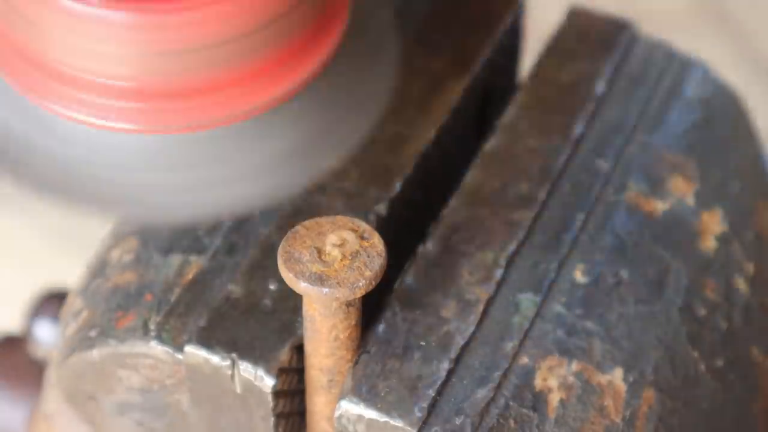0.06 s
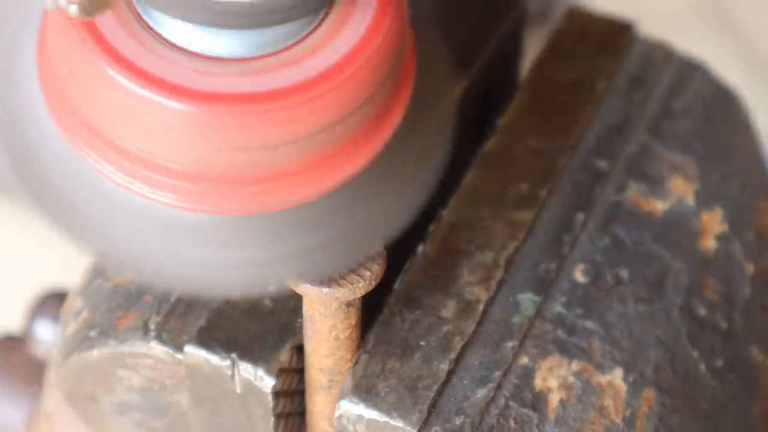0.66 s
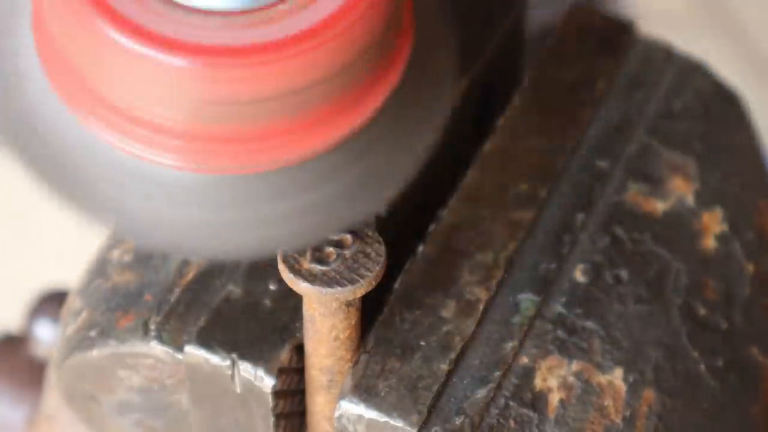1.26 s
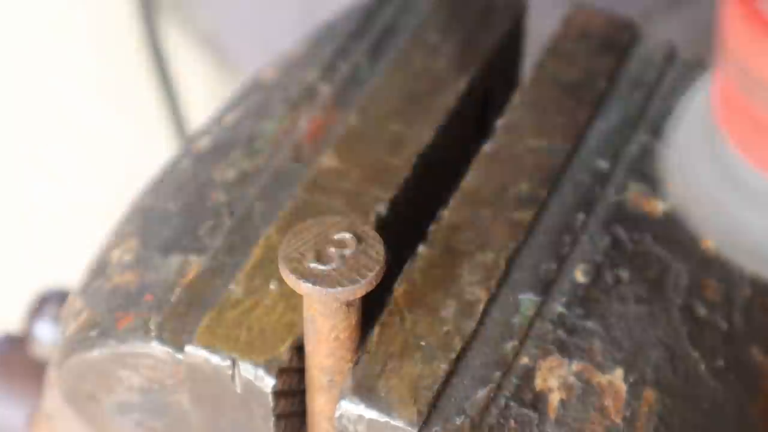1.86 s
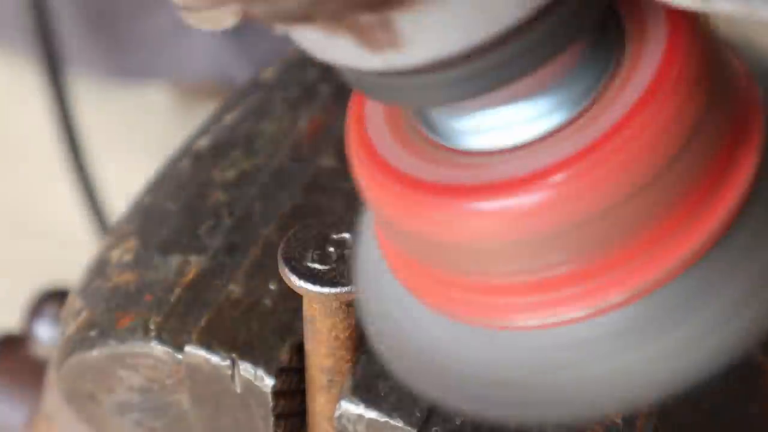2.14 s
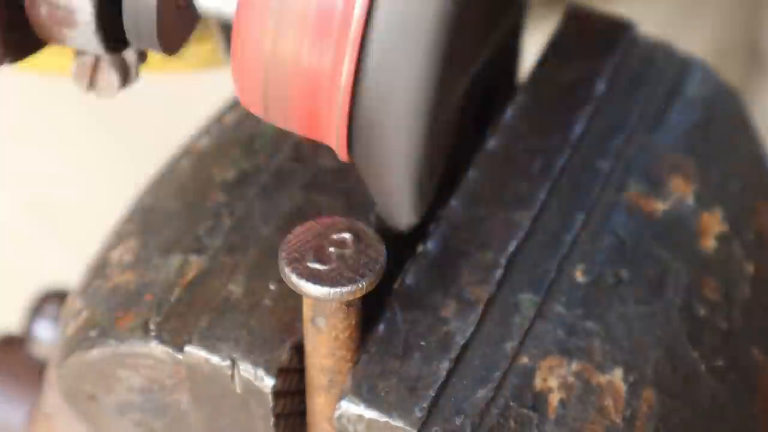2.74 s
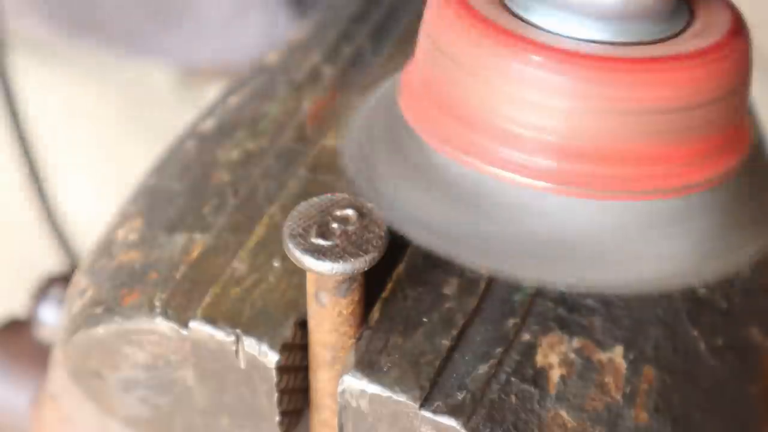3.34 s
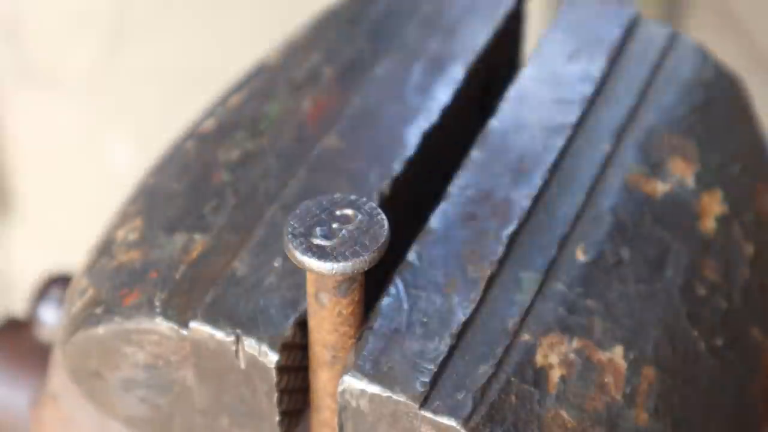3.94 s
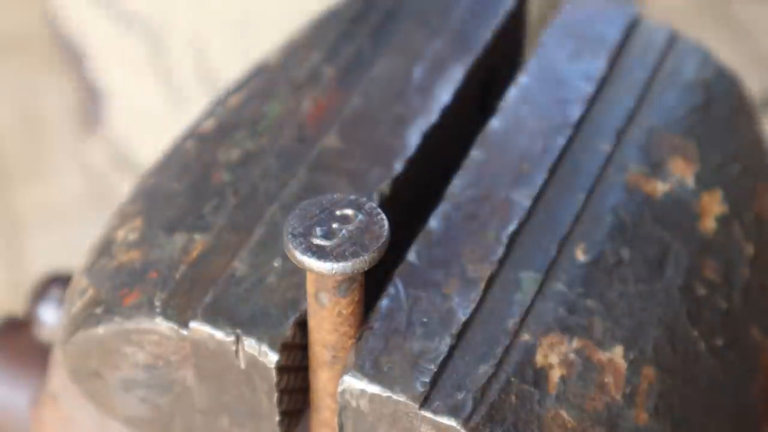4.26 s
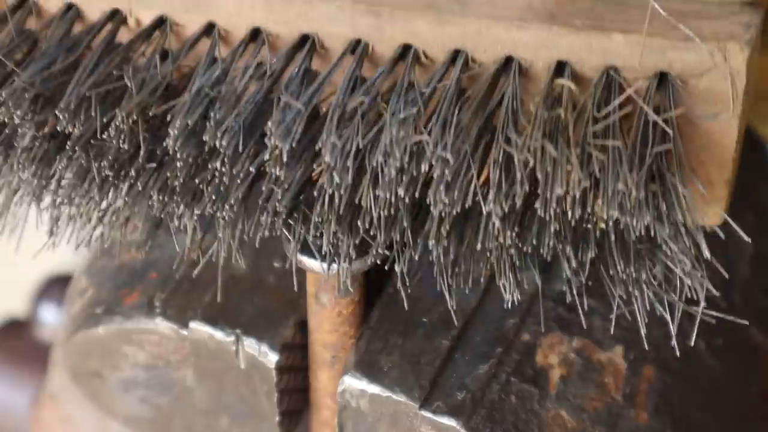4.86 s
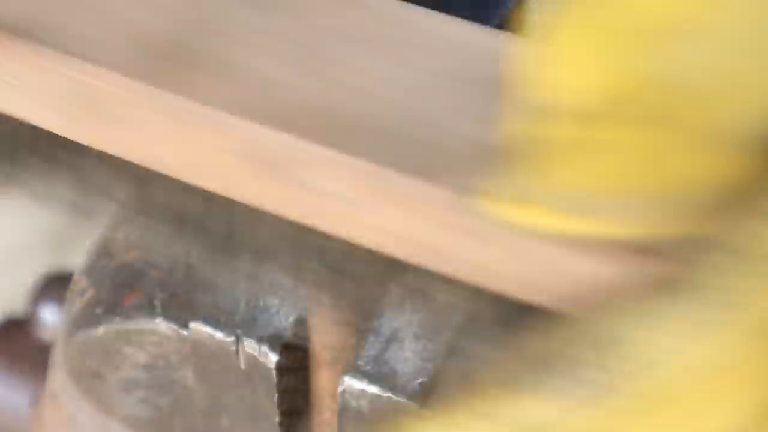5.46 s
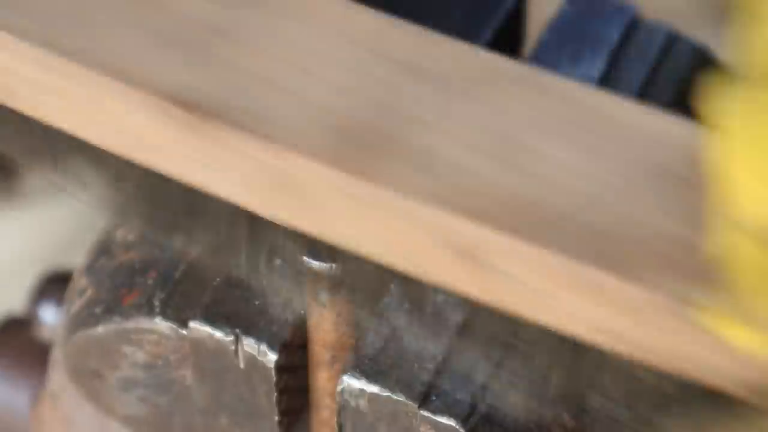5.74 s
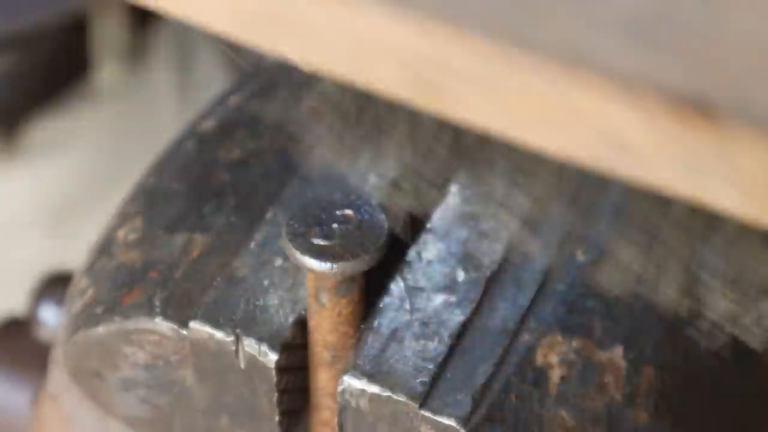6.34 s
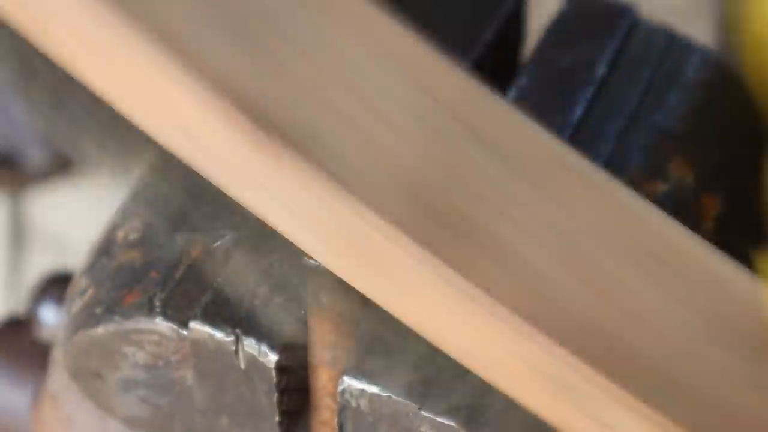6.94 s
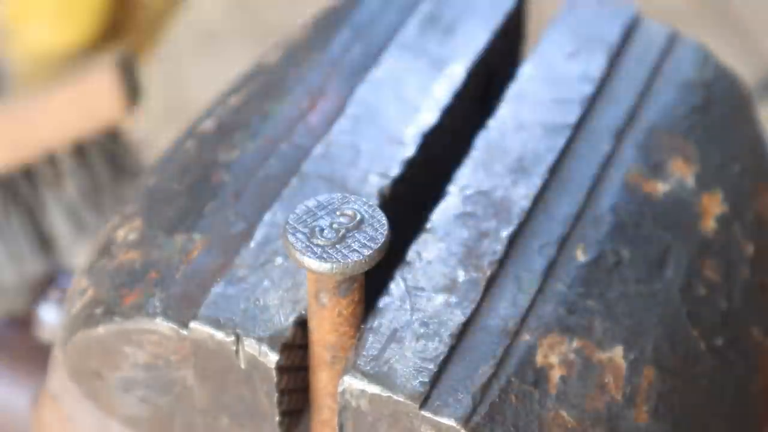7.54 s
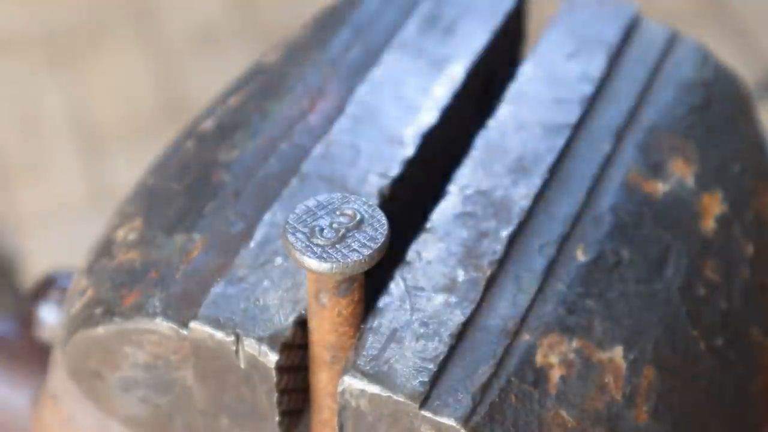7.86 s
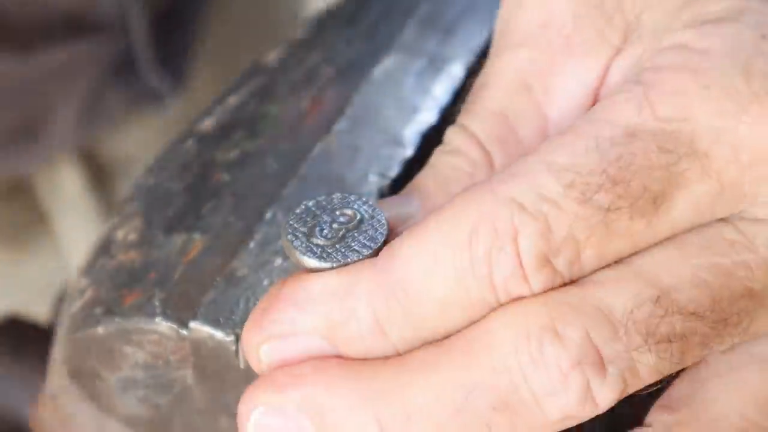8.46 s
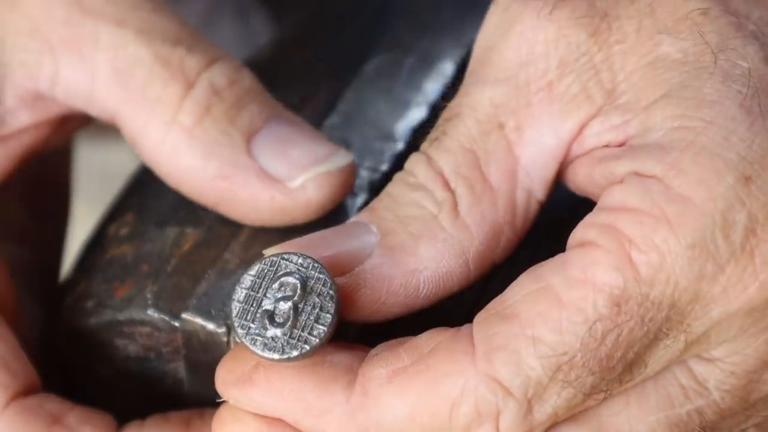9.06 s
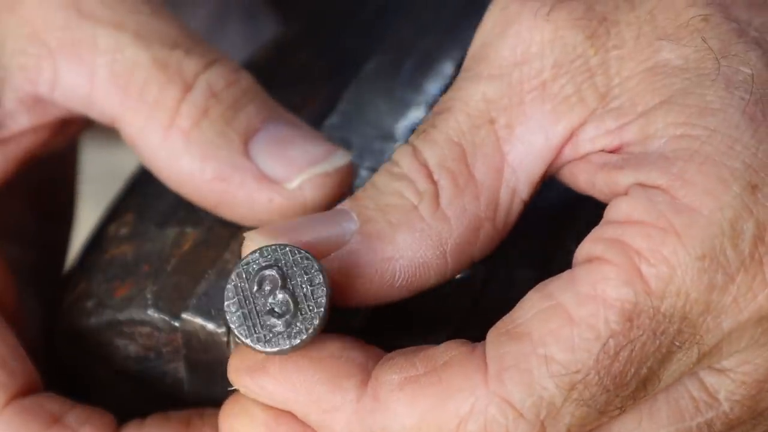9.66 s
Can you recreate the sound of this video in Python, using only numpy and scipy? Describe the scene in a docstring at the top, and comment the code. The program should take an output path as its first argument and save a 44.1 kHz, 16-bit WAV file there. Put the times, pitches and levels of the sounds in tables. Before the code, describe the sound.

A power wire brush scours a nail with squeals, winds down rattling on a bench, then a hand wire brush scrubs quickly.

```python
"""Wire-brushing a nail in a vice

A small workshop, microphone close to the bench. The wire cup of an angle grinder scours a clamped nail,
which sticks, slips and squeals. Switched off, the grinder runs down and rattles on the bench top.
A hand wire brush scrubs the nail head in short, then longer strokes; the vice knocks as it is opened."""
import sys
import numpy as np
from scipy import signal
from scipy.fft import rfft, irfft, next_fast_len
from scipy.io import wavfile
from scipy.ndimage import map_coordinates

SR = 44100
rng = np.random.default_rng(int(sys.argv[2]) if len(sys.argv) > 2 else 0)


def store_wav(level_fs):
    """Save 16-bit WAV to argv[1]."""
    pcm = np.round(np.clip(np.atleast_2d(level_fs), -1, 1) * 32767)
    wavfile.write(sys.argv[1], SR, pcm.T.astype(np.int16))


N = 427769
TIME = np.arange(N) / SR
BINS = np.fft.rfftfreq(N, 1 / SR) + 1e-3
TOP_HZ = 15900

# presses of the cup on the nail, each layer on its own scale
# (start [s], end [s], rasp [dB], sizzle [dB], wire ring [dB], drone [dB])
PRESSES = [(.02, .36, -39.5, -41.5, -80, -65.5), (.36, .72, -41, -49, -39, -56),
           (.72, 1.19, -52, -71, -35, -60.5), (1.42, 1.56, -42.5, -50, -39, -54),
           (1.56, 1.79, -63, -46.5, -49, -51), (1.87, 2.22, -40, -47.5, -41, -60.5),
           (2.46, 2.62, -41.5, -43.5, -65, -71), (2.69, 2.8, -40.5, -47.5, -51, -60),
           (2.87, 3.02, -40.5, -44.5, -62, -57), (3.02, 3.1, -36, -39, -40, -58),
           (3.28, 3.48, -41, -42, -78, -65), (3.5, 3.66, -39.5, -44.5, -40, -61)]
# wire tips on steel, close up (frequency [Hz], level [dB])
RASP_COLOUR = [(150, -13.5), (260, -20.5), (430, -13), (700, -12.5), (1200, -7.5), (2200, 1.5), (3500, 1),
               (4500, -0.5), (6000, -9.5), (7500, -14), (10000, -22)]
SIZZLE_COLOUR = [(3500, -23.5), (6000, -3), (7000, -0.5), (8500, 1), (9500, -3), (11000, -6.5),
                 (13300, -10.5), (14500, -13), (16000, -20)]
# resonances of the wires (frequency [Hz], width [Hz], level [dB])
WIRE_MODES = [(4920, 630, -1.5), (5330, 170, 5), (5780, 22, -28), (5710, 250, 0)]
PRESS_ATTACK_S, PRESS_RELEASE_S, LIFT_S = 0.023, 0.14, 3.79


def cup_brush(turns):
    """Thousands of wire tips flick over the steel; uneven tufts pulse once a turn."""
    scour, bright, _, shudder = spells(PRESSES, PRESS_ATTACK_S, PRESS_RELEASE_S)
    graze = np.clip(1 - (TIME - LIFT_S) / 0.33, 0, 1)  # light contact until the cup is lifted away
    tufts = undb(0.26 * np.sin(2 * np.pi * turns) + 0.41 * walk(70))
    tips = grains(7500, spread_db=1) * tufts
    rasp = through(tips * np.hypot(scour, graze * undb(-45.5)) * undb(1), colour(RASP_COLOUR))
    sizzle = through(tips * np.hypot(bright, graze * undb(-47.5)), colour(SIZZLE_COLOUR))
    caught = spells(PRESSES, PRESS_ATTACK_S, release=0.054)[2]
    catch = np.hypot(caught, graze * undb(-43))
    snagging = snags(hz=230, jitter=.3, spread_db=1.2)
    ring = through(noise() * snagging * catch * undb(-6.5 + 0.24 * walk(29.55)), body(WIRE_MODES))
    drone = shudder * undb(2 * walk(30.08)) * np.sin(2 * np.pi * turns + walk(45))
    return shifting(rasp + sizzle, rate=22, depth_db=3.5) + ring + drone


def snags(hz, jitter, spread_db, decay_cycles=0.45):
    """Envelope of wire bundles that snag and spring free, uneven in time and size; rms 1."""
    cycles = np.cumsum(hz * np.exp(jitter * walk(150))) / SR
    size = undb(spread_db * rng.standard_normal(N // 20))
    return unit(size[cycles.astype(int)] * np.exp(-(cycles % 1) / decay_cycles))


# bright scrapes at the nail head (peak time [s], level [dB], half length [s])
RIM_SCRAPES = [(.45, -41, .03), (1.165, -40, 0.013), (1.635, -36, 0.023), (1.665, -38, 0.0087),
               (1.733, -39, 0.012), (1.783, -38, 0.014)]
# their resonances (frequency [Hz], width [Hz], level [dB])
RIM_MODES = [(4780, 650, 4), (5450, 710, 4)]


def cup_rim():
    """The rim of the cup judders over the edge of the nail head."""
    force = noise() * swells(RIM_SCRAPES) * snags(hz=315, jitter=0.066, spread_db=3)
    return through(force, bands(RIM_MODES))


# nail and wire tips, at the vice (start [s], length [s], starting pitch [Hz], level [dB], sag [1/s])
NAIL_SQUEALS = [(0.926, 0.22, 3070, -42.5, 0.079), (1.082, 0.14, 3060, -43.5, .1),
                (1.446, 0.083, 3020, -40, 0.23), (1.607, 0.054, 3030, -36.5, 0.4),
                (1.71, 0.037, 3046, -40, .5), (1.761, 0.043, 3010, -38, .4),
                (1.854, 0.049, 3040, -37, 0.17), (2.078, 0.11, 3080, -43, .25),
                (2.198, 0.052, 3010, -35, .05), (2.243, 0.082, 3050, -38.5, .03),
                (2.732, 0.062, 3020, -44, .32), (2.738, 0.046, 5600, -38, 0.36),
                (3.034, 0.12, 3018, -36.5, 0.27), (3.123, 0.081, 3040, -36, 0.33),
                (3.42, .12, 2960, -39, 0.13), (3.515, 0.085, 3044, -38.5, .32),
                (3.584, 0.1, 2960, -34, .25)]
# bearings of the coasting grinder
# (start [s], length [s], starting pitch [Hz], level [dB], sag [1/s], roughness [rad])
BEARING_WHISTLES = [(4.03, .31, 2010, -57, .83, .5), (4.31, .39, 2370, -53, .83, .45),
                    (4.47, .21, 3600, -47.5, .7, 1.2), (4.76, .12, 3050, -53, .83, .5),
                    (4.965, .11, 2200, -47, 1.8, .35)]


def squeal(start, length, hz, db, sag_per_s, roughness, flutter_db, overtone_db):
    """Steel sticks and slips on steel; the pitch sags through the squeal."""
    out = np.zeros(N)
    t = TIME[:int(length * SR)]
    phase = 2 * np.pi * np.cumsum(hz * np.exp(-sag_per_s * t)) / SR + roughness * walk(350, t)
    tone = np.sin(phase) + undb(overtone_db) * np.sin(2 * phase)
    level = undb(db + flutter_db * walk(220, t)) * signal.windows.tukey(len(t), .7)
    out[int(start * SR):][:len(t)] = level * tone
    return out


# spindle under power, sagging as the cup is pressed on (time [s], speed [turns/s])
POWERED_SPEED = [(0, 170.4), (.22, 177.8), (.5, 171.1), (.8, 162.7), (1.1, 160.7), (1.35, 167.8),
                 (1.7, 164.8), (2, 172.3), (2.15, 170.5), (2.6, 175.8), (2.8, 169.5), (3, 176.8),
                 (3.15, 171.5), (3.35, 174.9), (3.65, 163.1), (3.85, 169.7)]
OFF_S, EASE_S, COAST_S, STILL_S = 3.885, .16, 1.21, 5.5


def spindle():
    """Turns per second: held by the motor, then easing into an exponential coast."""
    coasted = np.hypot(np.maximum(TIME - OFF_S, 0), EASE_S) - EASE_S
    return curve(POWERED_SPEED) * np.exp(-coasted / COAST_S)


# rush of air beside the grinder (frequency [Hz], level [dB])
AIR_COLOUR = [(200, -26), (330, -10), (520, -1.5), (750, -0.5), (1300, 3.5), (2300, 3.5), (3000, 2.5),
              (4600, 4), (6200, -3), (8300, 1), (10800, -10.5), (12800, -14), (14400, -10), (16000, -20)]


def fan(speed):
    """Fan and cup rush, fading as they slow; laid down, they are shielded by the bench and sound duller."""
    halvings = np.log2(speed[0] / speed)
    air = through(noise() * undb(-43 - 1.5 * halvings ** 2 + .5 * walk(24.75)), colour(AIR_COLOUR))
    shielded = undb(-15) * through(air, 1 / (1 + (BINS / 5500) ** 4))
    laid_down = np.interp(TIME, [SETTLE_S - .15, SETTLE_S + 0.46], [0, 1])
    return shifting((1 - laid_down) * air + laid_down * shielded, rate=14, depth_db=4.5, width_hz=286)


# overtones of spindle and motor (frequency [multiple of spindle speed], level [dB])
OVERTONES = [(3, 1.5), (3.28, -2), (6.56, -0.5), (9.84, -1.5), (11, -12), (13.12, -8.5), (16.4, -1)]
# resonances of the casing (frequency [Hz], width [Hz], level [dB])
CASING_MODES = [(336, 44, 4.5), (535, 91, -3), (1204, 105, 7), (1760, 150, -2.5), (2300, 380, 7.5),
                (3350, 760, -21)]
# clatter of teeth and tufts (frequency [Hz], level [dB])
CLATTER_COLOUR = [(200, -42), (400, -22), (800, -11.5), (1400, -12), (1750, -2), (3300, -0.5), (4600, 0.5),
                  (7000, -7)]
BUZZ_DB, CLATTER_DB, LOAD_LOSS_DB, COAST_LOSS_DB = -51.5, -46.5, 8.5, 7.5


def shafts(turns):
    """Overtones sweep through the casing's resonances; uneven teeth repeat their clatter every turn."""
    wobble = 0.017 * walk(22)  # the shaft leads and lags by a fraction of a turn
    buzz = np.zeros(N)
    for order, db in OVERTONES:
        level = undb(db + 2 * walk(45) + .8 * walk(9))
        buzz += level * np.sin(2 * np.pi * order * (turns + wobble) + .5 * walk(45))
    buzz = unit(through(buzz, body(CASING_MODES))) * undb(BUZZ_DB)
    teeth = rng.standard_normal(128)
    clatter = np.interp((turns + wobble / 4) * 128, np.arange(128), teeth, period=128)
    clatter = unit(through(clatter, colour(CLATTER_COLOUR))) * undb(CLATTER_DB)
    load = spells(PRESSES, PRESS_ATTACK_S, PRESS_RELEASE_S)[2]  # wires caught on the nail damp the buzz
    coasting = np.clip((TIME - OFF_S) / 0.36, 0, 1)  # without current the motor runs more smoothly
    return (buzz + clatter) * undb(-LOAD_LOSS_DB * load / load.max() - COAST_LOSS_DB * coasting)


# tone of the gears (time [s], level [dB])
GEAR_LEVEL = [(0, -54), (.27, -41.5), (.42, -88), (1.8, -62), (2, -53.5), (2.7, -50), (3.5, -49.5),
              (3.75, -55), (4.2, -68)]


def gears(turns):
    """The gears sing a wavering note at five times the spindle speed."""
    level = undb(curve(GEAR_LEVEL) + 2.5 * walk(40) + 1.5 * walk(10))
    return level * np.sin(2 * np.pi * 5 * turns + 1.1 * walk(60))


# whine of the run-down (time [s], level [dB])
WHINE_LEVEL = [(4.1, -80), (4.24, -61), (4.45, -61), (4.54, -65), (4.61, -59), (4.69, -59), (4.76, -80)]


def whine(speed, turns, order=117):
    """A thin whine sinks into hearing as the motor slows."""
    tone = (order * speed < TOP_HZ) * np.sin(2 * np.pi * order * turns + .4 * walk(440))
    return tone * undb(curve(WHINE_LEVEL) + 2.7 * walk(35))


# very high sizzle, close to the motor (time [s], level [dB])
SPARKLE_LEVEL = [(0, -63), (.5, -53), (1.15, -57), (1.27, -66), (1.6, -57), (2, -59), (2.4, -62),
                 (3.6, -58), (4, -63), (4.35, -56), (4.6, -68), (4.8, -93)]
# chirps of the motor (peak time [s], level [dB], half length [s])
CHIRPS = [(1.383, -42, .007), (4.15, -45, 0.014), (4.195, -41, 0.0093), (4.23, -37, 0.014),
          (4.502, -55, 0.0067), (4.549, -60, 0.009)]
# resonances of each (frequency [Hz], width [Hz], level [dB])
SPARKLE_MODES = [(14460, 1000, 0)]
CHIRP_MODES = [(4650, 670, -0.5), (14000, 1000, -1)]


def motor_sizzle():
    """The motor sizzles in very high, flickering bursts and gives a few rough chirps."""
    flicker = unit(undb(3.5 * walk(200)))
    sparkle = through(noise() * flicker * undb(curve(SPARKLE_LEVEL)), bands(SPARKLE_MODES))
    return sparkle + through(noise() * swells(CHIRPS), bands(CHIRP_MODES))


# hardest blows of the grinder on the bench (time [s], level [dB], crack relative to it [dB])
RATTLE = [(4.699, -30.5, -4), (4.72, -26.5, -9), (4.74, -28.5, -4.5), (4.751, -41, -10), (4.792, -33.5, -7),
          (4.852, -33.5, -4), (4.873, -35.5, -5), (4.905, -30, -5), (4.919, -30.5, -3.5), (4.947, -36, -3),
          (4.967, -36, -4), (5.021, -31.5, -5), (5.041, -30.5, -14), (5.057, -37, -16), (5.069, -35, -10),
          (5.086, -29.5, -12), (5.096, -33.5, -16), (5.131, -34.5, -17), (5.206, -35, -14),
          (5.245, -36.5, -1), (5.254, -41, 1), (5.278, -50, 9.5), (5.345, -60, 11)]
# resonances of the bench (frequency [Hz], width [Hz], level [dB])
BENCH_MODES = [(304, 11, 1), (393, 15.3, 2.5), (882, 51, 2.5), (1200, 120, -1), (1502, 180, -2),
               (2026, 150, -6), (2370, 100, -3.5), (2702, 130, 0), (3140, 130, -4.5), (4910, 120, -0.5),
               (5560, 150, -5.5)]
TOUCH_S, SETTLE_S, SHAKE_END_S, SHAKE_RELEASE_S = 4.53, 4.73, 4.9, 0.82


def bench_rattle():
    """The coasting grinder bounces and chatters on the bench, whose top booms; metal contacts crack."""
    touching = undb(-12) * hold(TOUCH_S, SHAKE_END_S, 0.029, SHAKE_RELEASE_S)
    weight = np.maximum(touching, hold(SETTLE_S, SHAKE_END_S, 0.036, SHAKE_RELEASE_S))
    times, db, crack_db = np.transpose(RATTLE)
    chatter = grains(1300, spread_db=0) * weight * undb(-43.5)
    force = noise() * blows(times, db, t60=0.035) + chatter
    edge = noise() * blows(times, db + crack_db, t60=0.059) + undb(-7.5) * chatter
    crack = colour([(200, -6), (1000, 2), (3000, -4.5), (6500, -2), (9000, -10), (15000, -19.5)])
    low_note = np.sin(2 * np.pi * 130.4 * (TIME - SETTLE_S) + 0.25 * walk(40))
    thump = blows([SETTLE_S], [-35.5], t60=0.59) * low_note  # the full weight lands
    top = body([(125, 49, 0)]) * colour([(60, -9), (130, 6.5), (250, -1), (800, -26)])
    boom = through(noise() * weight * undb(-75), top)
    return through(force, body(BENCH_MODES)) + through(edge, crack) + boom + thump


# strokes over the nail head
# (landing [s], peak time [s], level [dB], fall [s], ring emphasis [dB], scrape emphasis [dB])
STROKES = [(5.37, 5.377, -41.5, .01, -2, 9), (5.387, 5.4, -39, 0.014, -2, -1),
           (5.42, 5.444, -42, 0.016, 0, 5), (5.465, 5.489, -37.5, 0.023, -2.5, -1),
           (5.517, 5.53, -40, 0.024, 3.5, -5.5), (5.57, 5.589, -37, 0.018, 3.5, 0),
           (5.619, 5.63, -42.5, 0.021, 3, 1.5), (5.659, 5.686, -38.5, 0.021, -1, -2),
           (5.708, 5.727, -40, 0.016, -1.5, -4), (5.756, 5.781, -36, 0.013, 2, -3.5),
           (5.805, 5.822, -40.5, 0.019, 1, -2), (5.852, 5.876, -37.5, 0.015, 1, -3.5),
           (5.898, 5.917, -41.5, 0.023, 0, -7), (5.945, 5.967, -37, 0.018, -1, -12),
           (5.993, 6.008, -39.5, 0.019, -3, -25), (6.112, 6.125, -39.5, 0.039, -0.5, -5.5),
           (6.206, 6.225, -41, 0.025, 5, 0.5), (6.347, 6.376, -39.5, .023, 0, 2),
           (6.487, 6.521, -37, 0.023, 0, -3), (6.622, 6.656, -39.5, 0.024, 3, 2.5),
           (6.75, 6.781, -39.5, 0.025, 6, 3), (6.874, 6.9, -43, 0.025, 6, 5.5),
           (7.007, 7.027, -37, 0.026, -3, 0.5), (7.126, 7.158, -39, 0.025, 1.5, 3.5),
           (7.265, 7.297, -37.5, 0.03, -2, -2)]
# stray bristles flicking the nail (peak time [s], level [dB], half length [s])
FLICKS = [(6.333, -58, .005), (7.481, -58.5, 0.008)]
# hiss and dull scrape of the brush, close up (frequency [Hz], level [dB])
BRISTLE_COLOUR = [(60, 11), (150, -4), (500, -9.5), (1100, -18), (2200, 3), (3500, 3.5), (4400, 3),
                  (5400, -0.5), (6600, -0.5), (8100, 7), (9500, -0.5), (13000, -1), (16000, -7)]
SCRAPE_COLOUR = [(150, 1), (350, 2.5), (520, -0.5), (900, -1.5), (1500, 1.5), (2300, -2), (4000, -3),
                 (8000, -31)]
# resonances of the clamped nail (frequency [Hz], width [Hz], level [dB])
NAIL_MODES = [(2402, 22, -1.5), (2650, 51, -8), (2942, 55, 6), (3020, 200, -5), (4160, 150, -13.5)]
LANDING_S, STROKE_RISE_S = 0.0087, 0.02


def hand_brush():
    """In each stroke the bristles land, drag and sweep off the head; they hiss, and the nail rings."""
    hiss, ring, scrape = np.zeros((3, N))
    for touch, peak, db, fall, ring_db, scrape_db in STROKES:
        span = slice(int(peak * SR) - SR // 5, int(peak * SR) + SR // 5)
        t = TIME[span] - peak
        landed = np.clip((TIME[span] - touch) / LANDING_S + .5, 0, 1)
        sweep = np.exp(-(abs(t) / np.where(t < 0, STROKE_RISE_S, fall)) ** 1.81)
        drag = landed * np.where(t < 0, 1, sweep)  # heard until the stroke gathers speed
        hiss[span] += undb(db) * np.maximum(landed * sweep, undb(-9.5) * drag)
        ring[span] += undb(db + ring_db) * landed * sweep ** 1.46
        scrape[span] += undb(db + scrape_db) * np.maximum(landed * sweep, undb(-2.5) * drag)
    flicks = swells(FLICKS)
    tufts = undb(0.52 * walk(420))  # rows of bristles catch and let go
    bristles = through(grains(9000, spread_db=0) * tufts * (hiss + flicks), colour(BRISTLE_COLOUR))
    dull_scrape = through(noise() * tufts * scrape, colour(SCRAPE_COLOUR)) * undb(-7)
    nail = through(grains(4000, spread_db=2) * tufts * (ring + flicks), body(NAIL_MODES))
    nail *= undb(-0.5 + 0.41 * walk(380))  # passing bristles damp the ring unevenly
    scrub = shifting(bristles + dull_scrape, rate=16, depth_db=4.5, width_hz=264)
    return scrub + nail + nail_song(ring)


def twangs(count=9, t60=.07):
    """Every stroke plucks a different handful of bristles, each with a pitch of its own."""
    out, t = np.zeros((2, N)), TIME[:SR // 8]
    ring = decay(t, t60) * np.minimum(t / .002, 1)
    for _, peak, db, fall, *_ in STROKES:
        for pitch, when, size, place in rng.random((count, 4)):
            hz = 700 + 8500 * pitch ** 1.4
            tone = undb(db - 20) * (1 + size) * ring * np.sin(2 * np.pi * hz * t)
            start = int((peak + fall * (when - .3)) * SR)
            out[:, start:start + len(t)] += np.outer([1, 2 * place - 1], tone)
    return out


# notes of the nail, relative to its ring (pitch [Hz], in short strokes [dB], in long strokes [dB])
NAIL_NOTES = [(2960, -9.5, -11), (2420, -10, -22)]
LONG_STROKES_S, SING_DECAY_S = 6.07, .003


def nail_song(ring):
    """Kept going by the bristles, the nail sings two wavering notes."""
    keep = np.exp(-1 / (SING_DECAY_S * SR))
    held = signal.lfilter([1 - keep], [1, -keep], ring)
    notes = np.zeros((2, N))
    for hz, short_db, long_db in NAIL_NOTES:
        level = undb(np.where(TIME < LONG_STROKES_S, short_db, long_db) + 2.5 * walk(160))
        waver = 1.1 * np.array([walk(170), walk(170)])
        notes += level * np.sin(2 * np.pi * hz * TIME + waver)
    return held * notes


def brush_bump(at_s=6.1195):
    """The brush's wooden back bumps the vice; the bench answers with a short, low ring."""
    push = np.array([[1], [.5]]) * swells([(at_s, -28.5, 0.0014)])
    ring = through(push, body([(150, 40, 0)])) * undb(-36)
    return through(push, BINS ** 2 / (BINS ** 2 + 70 ** 2)) + ring


# knocks at the vice (time [s], clank [dB], thud [dB], tick [dB], t60 of the thud [s])
KNOCKS = [(6.116, -58, -48, -48, 0.037), (8.239, -57, -69, -68, 0.17), (8.296, -52, -70, -64, .08),
          (8.36, -48.5, -56, -51, 0.26), (8.408, -57, -61, -59, 0.088), (8.531, -40.5, -52, -64, 0.17),
          (8.59, -35, -31, -70, 0.19), (8.968, -47, -62, -44.5, 0.2), (9.029, -54.5, -73, -61, 0.11)]
# resonances of the iron and of the contact (frequency [Hz], width [Hz], level [dB])
VICE_MODES = [(246, 36, 4), (375, 59, 3), (455, 33, -0.5), (554, 97, -4.5), (790, 94, -7.5), (950, 70, -22),
              (1400, 160, -24)]
TICK_MODES = [(745, 190, -2.5), (1030, 110, 2), (1330, 240, -2.5), (2220, 240, -5), (2550, 170, -6.5),
              (3080, 140, -8.5), (3700, 16, 0), (3850, 280, -13), (4440, 140, -13), (6930, 25, -14)]
# the nail sliding out of the jaws (peak time [s], level [dB], half length [s])
SLIDES = [(8.565, -55.5, 0.023), (8.64, -54.5, 0.036)]


def vice():
    """Knocks ring the iron, thud through the bench and tick; the freed nail scrapes the jaws."""
    times, clank_db, thud_db, tick_db, t60 = np.transpose(KNOCKS)
    iron = body(VICE_MODES) / (1 + 1j * BINS / 1400)
    bench = colour([(25, -16.5), (70, -6.5), (130, -1), (200, -5.5), (350, -14), (1200, -49), (5000, -57)])
    rub = colour([(700, 12), (1500, 10), (3000, 2.5), (8000, -4), (15000, -21)])
    clank = through(noise() * blows(times, clank_db, t60 * 0.91), iron)
    thud = through(noise() * blows(times, thud_db, t60), bench)
    tick = through(noise() * blows(times, tick_db, t60=0.097), body(TICK_MODES))
    slide = through(grains(5000, spread_db=3) * swells(SLIDES), rub)
    parting = hold(8.5, 8.72, .04, 0.26) * undb(-70.5)  # the jaws sing faintly as they part
    jaws = through(noise() * parting, body([(1490, 83, 0)]))
    return clank + thud + tick + slide + jaws


# gusts as the cup swings towards the microphone (peak time [s], level [dB], half length [s])
GUSTS = [(.02, -46.5, 0.059), (1.97, -40.5, 0.033), (2.43, -45, 0.042), (2.56, -51, 0.023), (3, -56, .04),
         (3.24, -54, 0.024), (3.42, -53, 0.059), (3.77, -50, 0.022)]


def draught(steady_db=-70.5, end_s=3.8):
    """Air flung off the cup buffets the microphone."""
    flow = undb(steady_db) * np.clip((end_s - TIME) / 0.045, 0, 1) + swells(GUSTS)
    buffet = colour([(15, -6), (45, 1.5), (80, -4), (140, -16), (300, -58), (1000, -69)])
    return through(noise() * flow, buffet)


# handling at the bench (start [s], end [s], rustle [dB], rumble [dB])
HANDLING = [(4.56, 5.3, -50, -70), (5.35, 7.35, -67, -70), (7.45, 7.78, -70, -100), (7.98, 9.0, -66, -75),
            (8.56, 9.7, -72.5, -68.5)]
# level of the background hiss, which steps up just before 8 s (time [s], level [dB])
HISS_LEVEL = [(7.35, -74), (7.94, -76), (7.99, -69), (9.7, -71)]
# spectra of room tone and sleeves (frequency [Hz], level [dB])
ROOM_COLOUR = [(25, -25), (70, -27), (150, -23), (210, -14.5), (300, -6), (640, -26), (1800, -24),
               (3000, -29), (5000, -24), (15500, -25.5)]
RUSTLE_COLOUR = [(25, -34), (70, -12), (150, -16), (210, -13.5), (300, -17), (640, -14.5), (1800, -20),
                 (3000, -21), (5000, -27), (15500, -41)]


def background():
    """Faint hiss of the workshop; hands and sleeves rustle dully and make the bench rumble."""
    rub, shake = spells(HANDLING, attack=0.017, release=0.24)
    hiss = through(noise() * undb(curve(HISS_LEVEL)), colour(ROOM_COLOUR))
    rustle = through(noise() * rub * undb(1.34 * walk(30)), colour(RUSTLE_COLOUR))
    bench = colour([(30, -9), (65, -5), (93, 5.5), (125, -11), (200, -10.5), (800, -50)])
    rumble = through(noise() * shake, bench)
    return hiss + rustle + rumble * np.array([[1], [.6]])  # the bass is more alike at the two microphones


def workshop(x, t60, wet_db):
    """Diffuse echoes of a small room reach the microphone, duller than the direct sound."""
    t = TIME[:SR // 2]
    tail = unit(rng.standard_normal((2, len(t))) * decay(t, t60) * (t > .006)) / np.sqrt(len(t))
    echoes = signal.fftconvolve(x, tail, axes=1)[:, :N]
    return x + undb(wet_db) * through(echoes, 1.98 / (1 + 1j * BINS / 1500))


def undb(db):
    """Decibels to gain."""
    return 10 ** (np.asarray(db) / 20)


def unit(x):
    """Scale to rms 1."""
    return x / np.sqrt(np.mean(x ** 2))


def curve(table):
    """(time, value) points as a value per sample."""
    return np.interp(TIME, *np.transpose(table))


def noise():
    """Unrelated noise for mid and side."""
    return rng.standard_normal((2, N))


def walk(rate, t=TIME):
    """Random drift with a spread near 1 and `rate` turning points a second."""
    knots = rng.standard_normal(N // 20)
    return 1.65 * np.interp(t * rate, np.arange(len(knots)), knots)


def grains(rate, spread_db):
    """Tiny random impacts, `rate` a second; rms 1."""
    hits = rng.random((2, N)) < rate / SR
    return unit(hits * np.sign(noise()) * undb(spread_db * noise()))


def decay(t, t60):
    """Exponential fall of 60 dB in t60 seconds."""
    return np.exp(-np.log(1000) * t / t60)


def blows(times, levels_db, t60):
    """Envelope of blows that start at once and die away; t60 is shared or one per blow."""
    out = np.zeros(N)
    for start, db, fall in np.broadcast(times, levels_db, t60):
        tail = out[int(start * SR):][:SR // 2]
        tail += undb(db) * decay(TIME[:len(tail)], fall)
    return out


def swells(table):
    """Envelope of short, bell-shaped swells."""
    return sum(undb(db) * np.exp(-((TIME - peak) / half) ** 2) for peak, db, half in table)


def hold(start, end, attack, release):
    """Envelope that rises around start, holds, and falls away after end."""
    return np.clip((TIME - start) / attack + .5, 0, 1) * np.clip(1 - (TIME - end) / release, 0, 1)


def spells(table, attack, release):
    """For each level column of (start, end, dB, ..) rows, an envelope that follows the strongest row."""
    out = np.zeros((len(table[0]) - 2, N))
    for start, end, *levels_db in table:
        out = np.maximum(out, undb(levels_db)[:, None] * hold(start, end, attack, release))
    return out


def colour(points):
    """Frequency response through (Hz, dB) points, with unit power."""
    hz, db = np.transpose(points)
    return unit(undb(np.interp(np.log(BINS), np.log(hz), db)))


def body(modes):
    """Frequency response of a set of resonances, with unit power."""
    response = sum((-1) ** k * undb(db) / (1 + 1j * (BINS ** 2 - hz ** 2) / (BINS * width))
                   for k, (hz, width, db) in enumerate(modes))
    return response / np.sqrt(np.mean(abs(response) ** 2))


def bands(modes):
    """Resonances squared for steeper flanks, with unit power."""
    return unit(abs(body(modes)) ** 2)


def through(x, response):
    """Filter x by a frequency response."""
    size = next_fast_len(N + SR // 2, True)
    gain = np.interp(np.fft.rfftfreq(size, 1 / SR), BINS, response)
    return irfft(rfft(x, size) * gain, size)[..., :N]


def shifting(x, rate, depth_db, width_hz=170):
    """Resonances come and go at random, as when other bundles of wire touch the steel."""
    hz, t, frames = signal.stft(x, SR, nperseg=512)
    chance = rng.standard_normal((200, 2000))
    grid = np.meshgrid(hz / width_hz, t * rate, indexing="ij")
    patches = map_coordinates(chance, grid, order=1, mode="wrap")
    return signal.istft(frames * unit(undb(depth_db * patches)), SR, nperseg=512)[1][:, :N]


# stereo image at the microphone, centred at first, then wide open (time [s], side gain [dB])
STEREO_WIDTH = [(4.7, -90), (5.05, -48), (5.6, -54), (5.8, -51), (6.02, -15), (6.1, 0)]


def scene():
    """All sources in the room, as mid and side, turned into left and right."""
    speed = spindle()
    turns = np.cumsum(speed) / SR
    nail = sum(squeal(*row, roughness=0.15, flutter_db=1.5, overtone_db=-13) for row in NAIL_SQUEALS)
    bearings = sum(squeal(*row, flutter_db=3.5, overtone_db=-11) for row in BEARING_WHISTLES)
    scouring = cup_brush(turns) + cup_rim() + nail
    running = np.clip((STILL_S - TIME) / 0.086, 0, 1)  # the coasting spindle is finally held still
    machine = running * (fan(speed) + shafts(turns) + gears(turns) + whine(speed, turns))
    grinder = scouring + machine + bearings + motor_sizzle() + bench_rattle()
    brushing = hand_brush() + twangs() + brush_bump()
    tools = workshop(grinder + brushing, t60=0.24, wet_db=-15.5)
    knocks = workshop(vice(), t60=0.84, wet_db=-13.5)
    mid, side = tools + knocks + draught() + background()
    side = side * undb(curve(STEREO_WIDTH))
    return np.array([mid + side, mid - side])


def record(dry):
    """The recorder cuts the treble steeply above TOP_HZ."""
    return signal.sosfilt(signal.ellip(10, .2, 70, TOP_HZ, fs=SR, output="sos"), dry)


dry = scene()
out = record(dry)
store_wav(out)
```